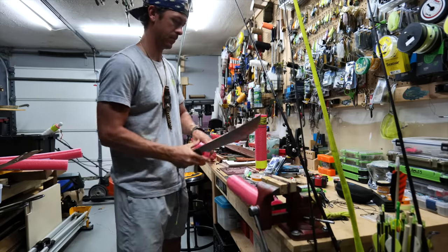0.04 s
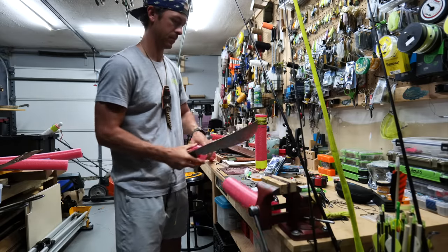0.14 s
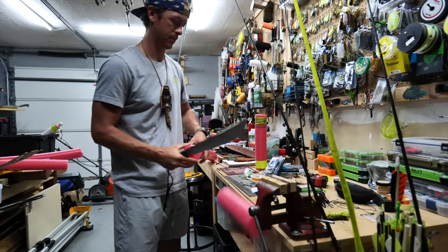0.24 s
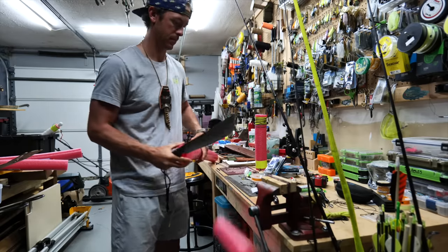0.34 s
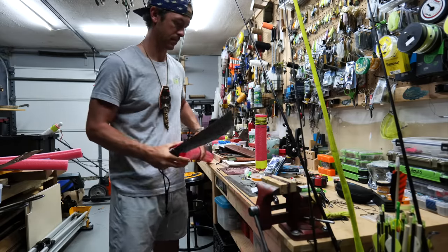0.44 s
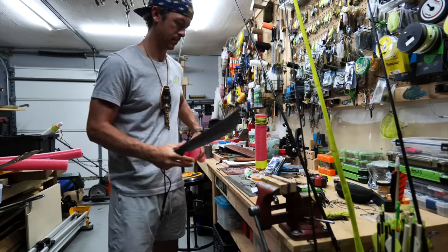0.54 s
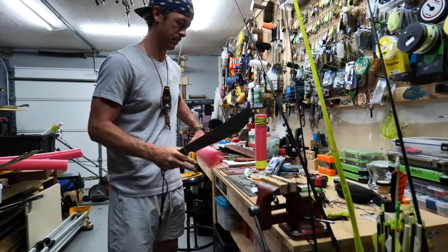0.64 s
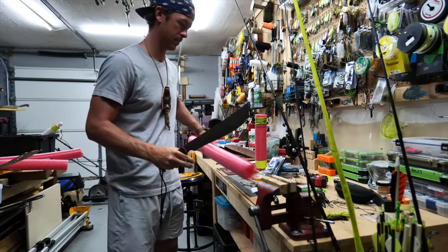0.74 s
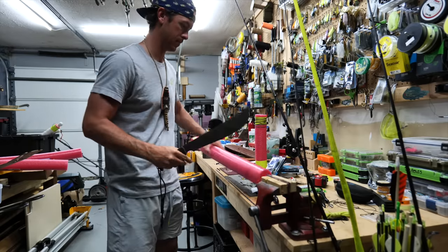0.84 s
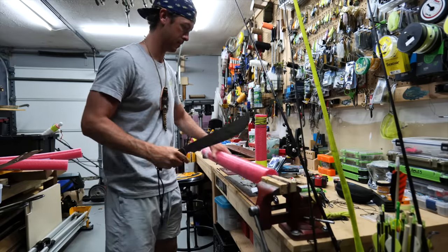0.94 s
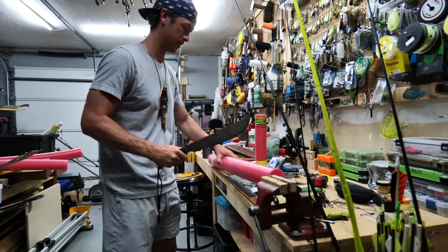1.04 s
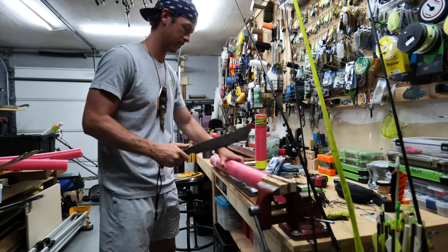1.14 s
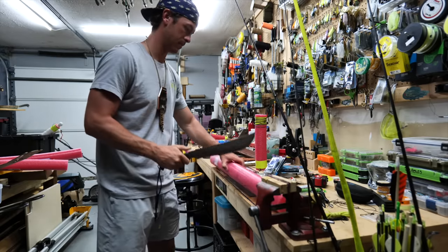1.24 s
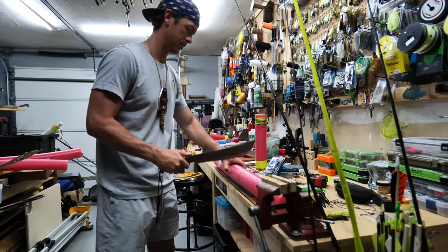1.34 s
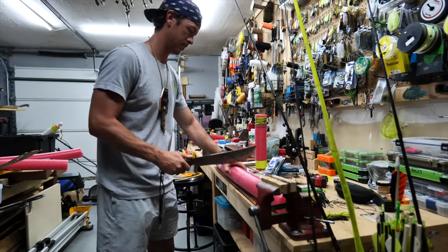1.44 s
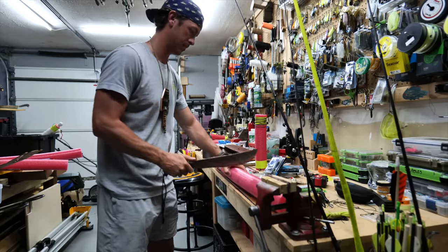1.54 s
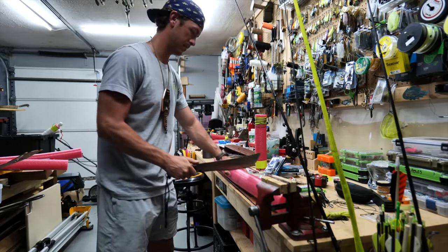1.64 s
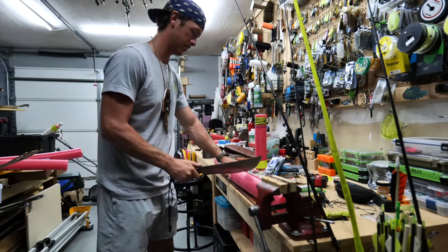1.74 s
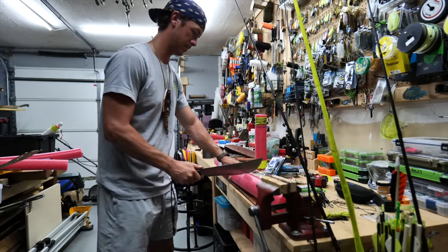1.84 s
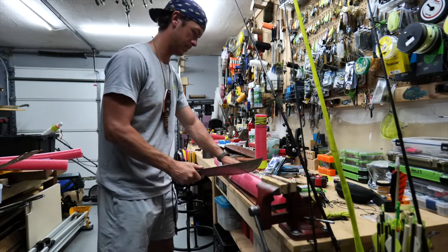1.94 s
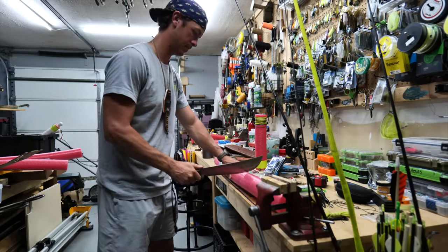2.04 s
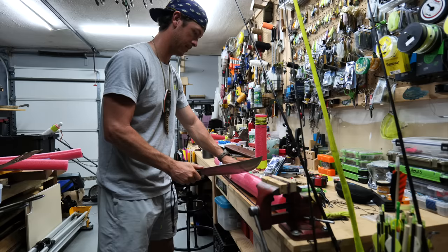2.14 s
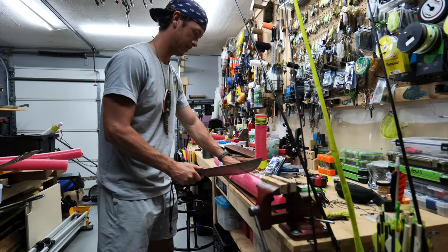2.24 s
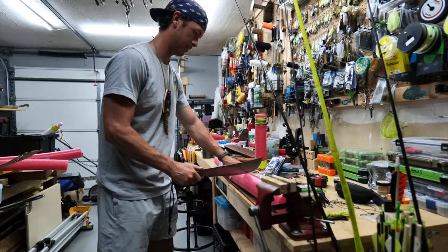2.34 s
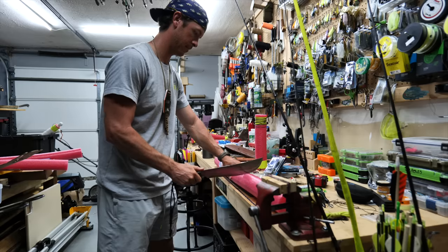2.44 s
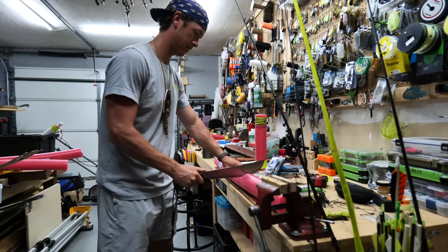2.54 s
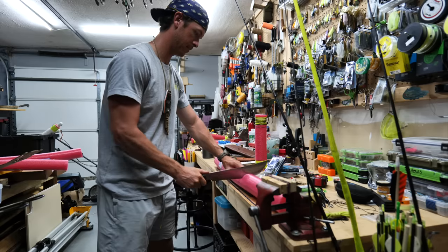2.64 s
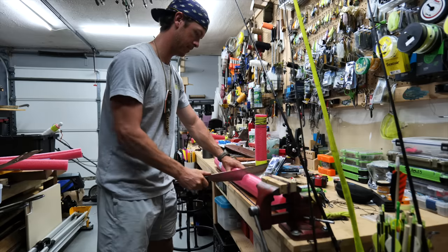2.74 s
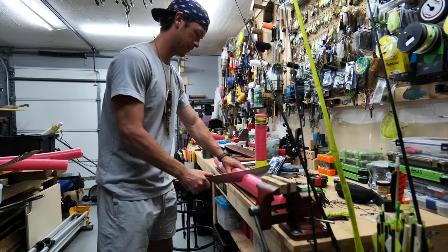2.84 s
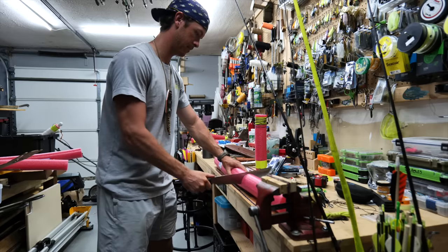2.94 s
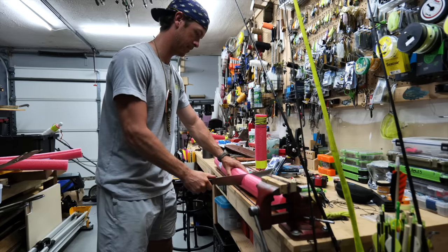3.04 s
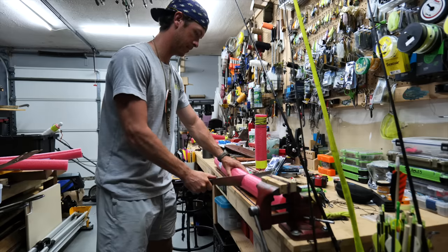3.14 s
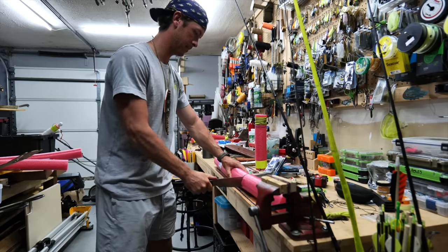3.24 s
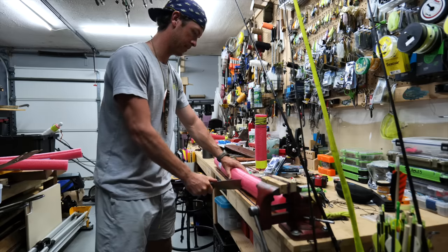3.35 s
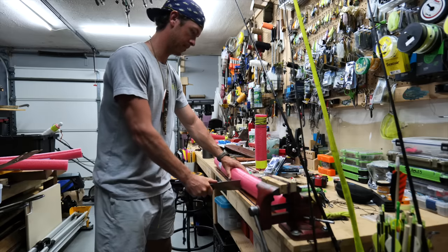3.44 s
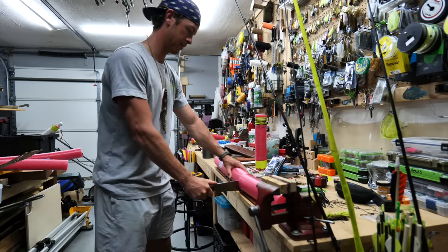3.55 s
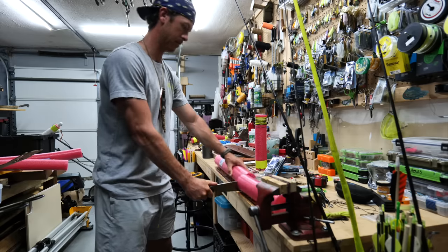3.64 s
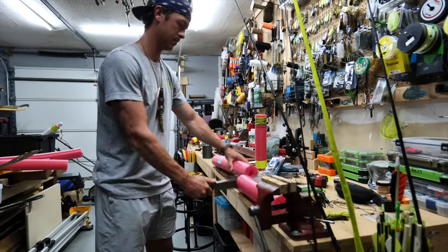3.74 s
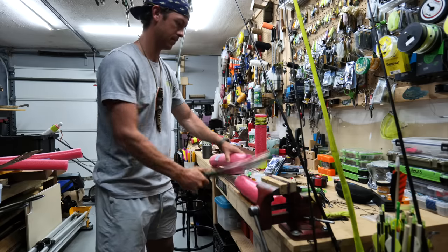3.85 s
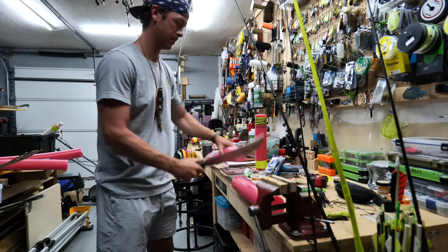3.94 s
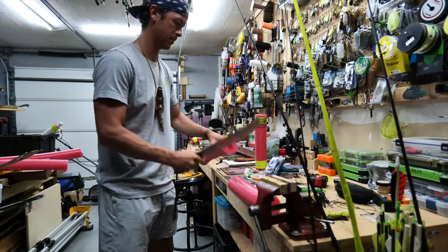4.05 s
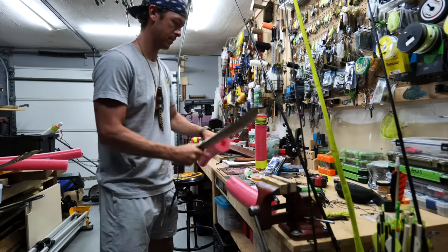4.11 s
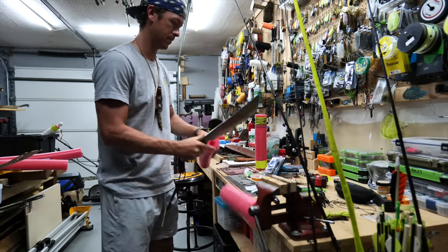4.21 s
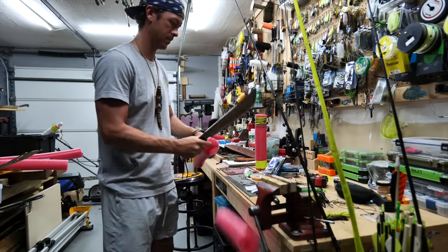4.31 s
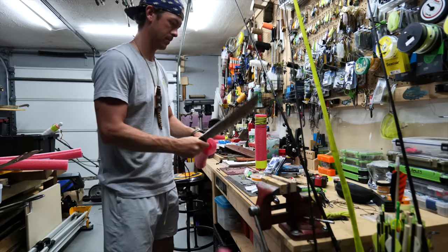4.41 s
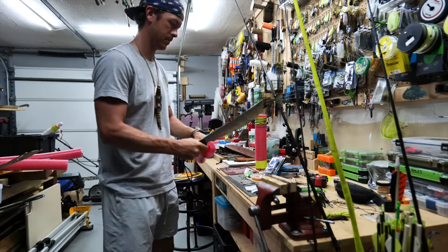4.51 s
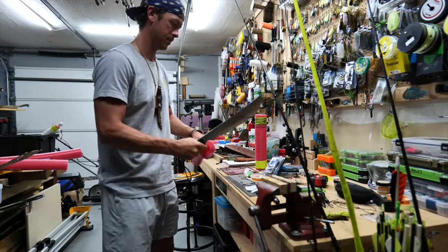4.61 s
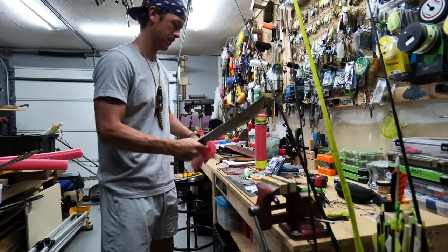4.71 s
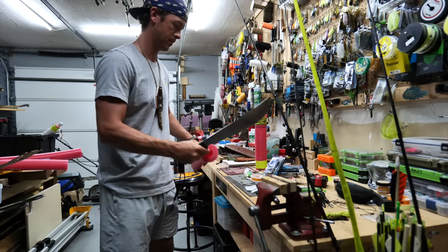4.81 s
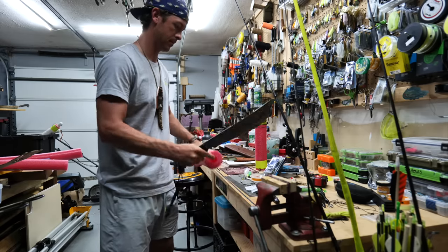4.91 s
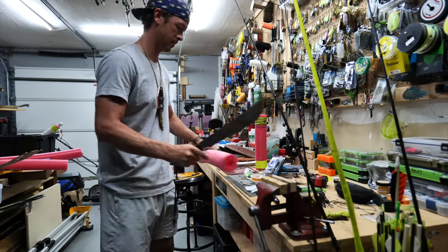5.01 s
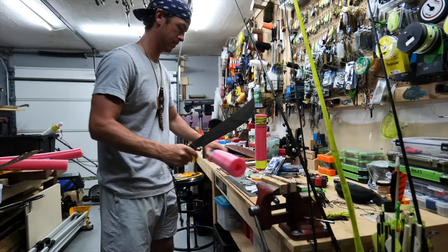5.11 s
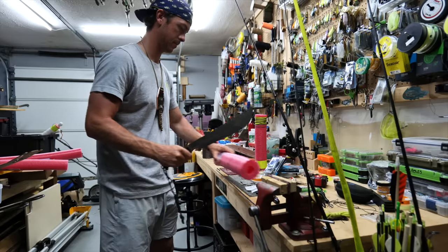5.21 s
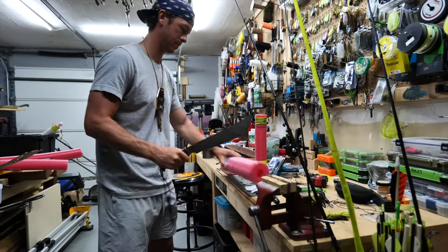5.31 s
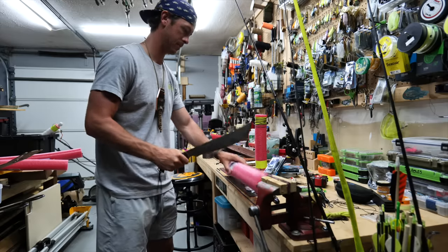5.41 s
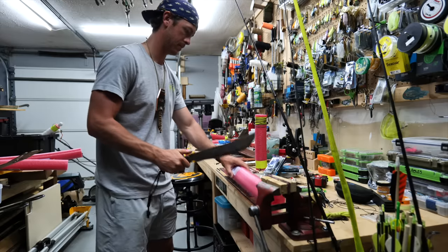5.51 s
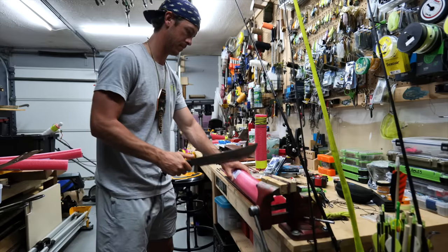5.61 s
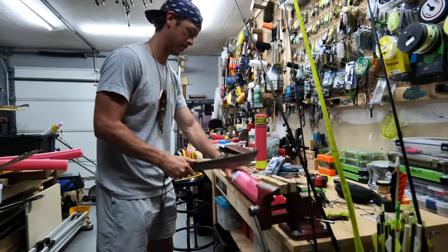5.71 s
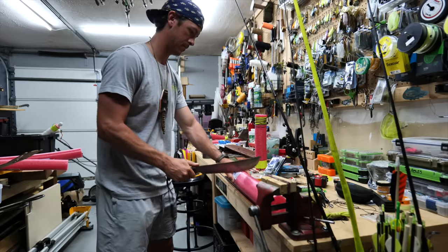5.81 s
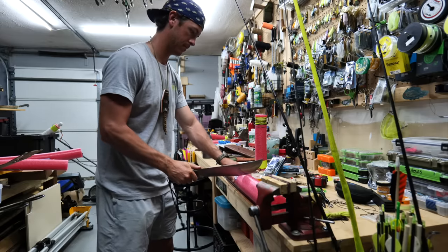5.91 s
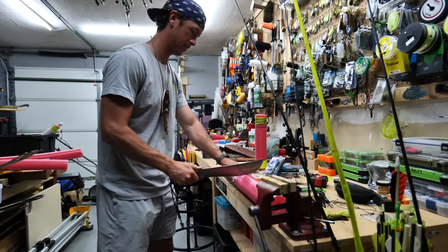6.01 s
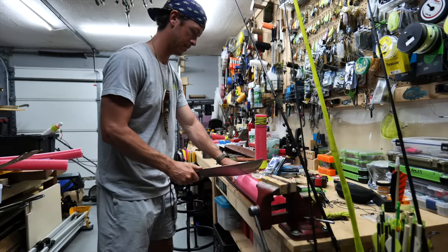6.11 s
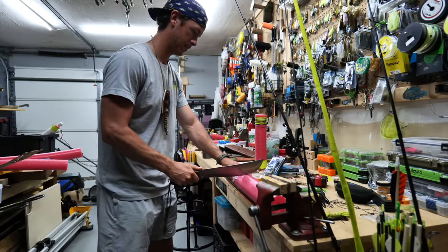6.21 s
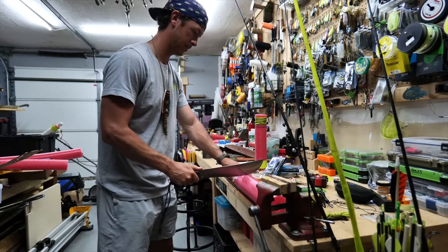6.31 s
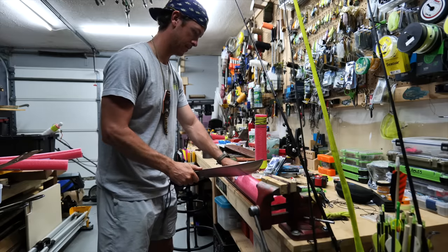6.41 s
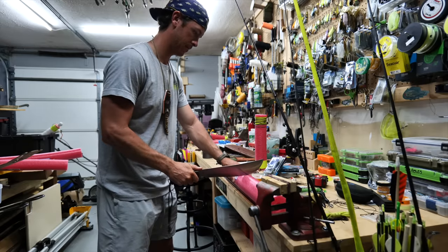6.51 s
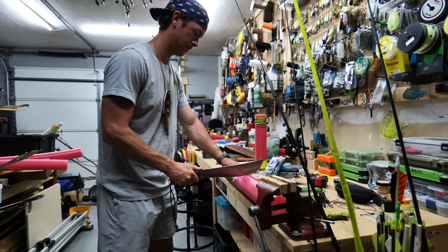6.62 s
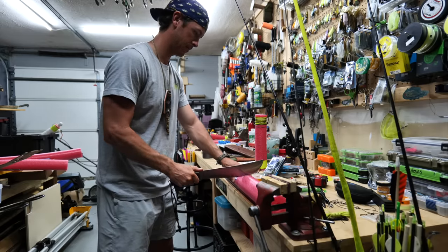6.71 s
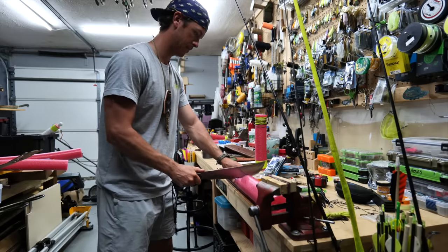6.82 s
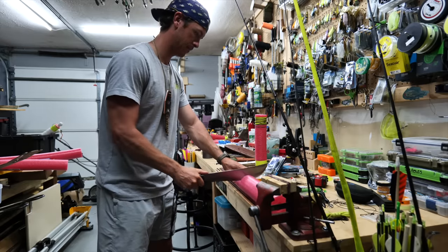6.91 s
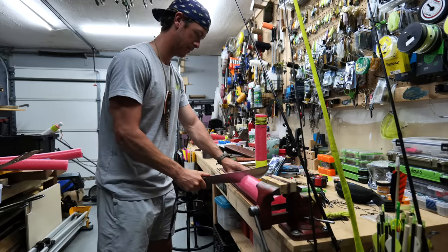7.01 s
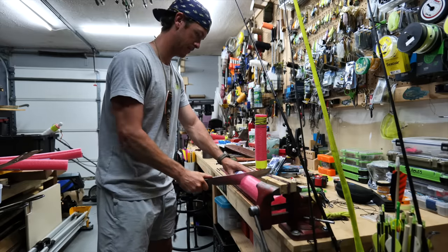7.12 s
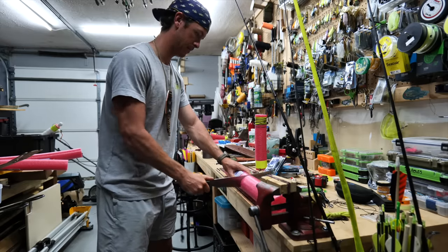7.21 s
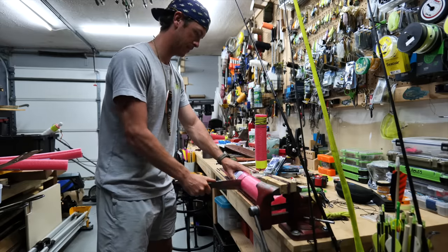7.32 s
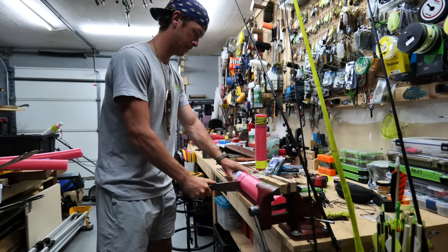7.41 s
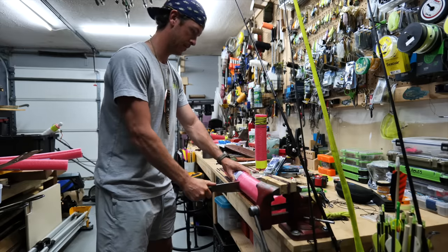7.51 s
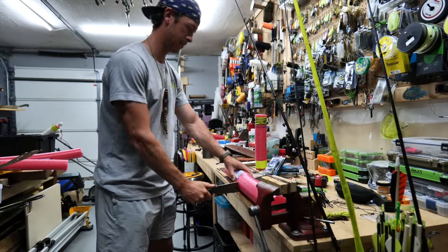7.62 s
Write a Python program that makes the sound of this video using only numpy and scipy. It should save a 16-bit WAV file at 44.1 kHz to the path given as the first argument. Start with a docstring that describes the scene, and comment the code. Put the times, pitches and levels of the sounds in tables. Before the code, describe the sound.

Two crackling, hissing cuts through stiff foam, hollow tube pieces smacking concrete and bouncing, hands scuffing foam, over a low garage drone.

```python
"""A machete slices lengths off a foam pool noodle in a bench vice: its cells burst in a crackling hiss. Patches
of foam snap under the jerking blade, a low pop falls in pitch as the blade breaks through, and blade and noodle
knock. Two cut lengths drop to the concrete floor and bounce; decaying sines ring their bores as open pipes.
Hands slide and scuff the foam as grains and noise bursts, over the steady drone and hiss of the garage. A
nearly mono microphone clips the loudest peaks."""
import sys
import numpy as np
from scipy import signal
from scipy.fft import rfft, irfft
from scipy.io import wavfile

SR = 44100
rng = np.random.default_rng(int(sys.argv[2]) if len(sys.argv) > 2 else 0)


def transcribe(signal):
    """Save signal, clipped to [-1, 1], as a 16-bit WAV file at the path in sys.argv[1]."""
    frames = np.atleast_2d(signal).T
    limited = np.clip(frames, -1, 1)
    pcm = np.round(limited * 32767).astype(np.int16)
    wavfile.write(sys.argv[1], SR, pcm)


N = 337806   # length of the scene [samples]


def from_db(db):
    """Decibels to gain."""
    return 10 ** (np.asarray(db) / 20)


def rms_one(x):
    """Scale to rms 1."""
    return x / np.sqrt(np.mean(x ** 2) + 1e-20)


def at_hz(points, hz):
    """Read a table on a log-frequency axis."""
    known_hz, values = np.transpose(points)
    return np.interp(np.log(hz + 1e-6), np.log(known_hz), values)


def add(track, s, sound):
    """Mix a sound in at a time in seconds."""
    start = round(s * SR)
    track[start:start + len(sound)] += sound[:N - start]


def cut(x, hz, kind, order=2):
    """Butterworth filter."""
    safe_hz = np.clip(hz, 10, .45 * SR)
    sections = signal.butter(order, safe_hz, kind, fs=SR, output="sos")
    return signal.sosfilt(sections, x + 1e-18)


def colour(x, spectrum, size=4096):
    """Causal (minimum-phase) filter with the given spectrum; keeps the power of white noise."""
    gains = from_db(at_hz(spectrum, np.fft.rfftfreq(size, 1 / SR)))
    cepstrum = irfft(np.log(gains))
    # fold the cepstrum onto positive time: minimum phase
    cepstrum[1:size // 2] *= 2
    cepstrum[size // 2 + 1:] = 0
    response = irfft(np.exp(rfft(cepstrum)))
    return signal.fftconvolve(x, response / np.linalg.norm(response))[:len(x)]


def dying(t60):
    """Half a second of exponential decay, down 60 dB after t60 seconds."""
    return np.exp(-np.log(1000) * np.arange(SR // 2) / SR / max(t60, 1e-4))


def burst(t60):
    """Dying white noise."""
    return dying(t60) * rng.standard_normal(SR // 2)


def ring(modes, pitch=1):
    """Struck modes as dying sines."""
    t = np.arange(SR // 2) / SR
    return sum(from_db(db) * dying(t60) * np.sin(2 * np.pi * hz * pitch * t) for hz, db, t60 in modes)


def grains(per_s, spread_db, clump_db, clumps_per_s):
    """Random clicks, sized by spread_db, whose level swells in clumps; rms 1."""
    sizes = from_db(spread_db * np.minimum(rng.exponential(1, N), 4))
    clicks = sizes * rng.choice([-1, 1], N) * (rng.random(N) < per_s / SR)
    clumps = rms_one(cut(rng.standard_normal(N), clumps_per_s, "low"))
    return rms_one(clicks * from_db(clump_db * np.clip(clumps, -2, 2)))


# Strokes through the noodle: (edge bites [s], breaks through [s], crackle at the bite [dB],
# crackle late in the stroke [dB], surge at the break [dB])
STROKES = [(2.482, 3.339, -38.5, -29.5, 12), (6.811, 7.379, -34.5, -31.5, 11)]
# The hand lets up once before the last push: (time [s], half-length [s], level change [dB])
EASE_OFF = (3.18, 0.11, -14)


def blade_effort(bite_s=0.0046, surge_s=0.13, release_db_per_s=348):
    """Each stroke bites, presses slowly harder, surges as the last wall gives and dies away; as gain."""
    t, effort = np.arange(N) / SR, 0
    for start_s, break_s, first_db, late_db, surge_db in STROKES:
        press = np.interp(t, [start_s, break_s], [first_db, late_db])
        surge = surge_db * np.exp(np.minimum(t - break_s, 0) / surge_s)
        release = release_db_per_s * np.maximum(t - break_s, 0)
        bite = np.clip((t - start_s) / bite_s, 0, 1)
        effort = effort + bite * from_db(press + surge - release)
    ease_s, half_s, ease_db = EASE_OFF
    return effort * from_db(ease_db * np.exp(-((t - ease_s) / half_s) ** 2))


# Colour of bursting cells: (frequency [Hz], relative level per Hz [dB])
FOAM_COLOUR = [(65, -54), (110, -16), (201, -4.5), (381, -5), (666, -8), (739, -9), (1010, -4), (1210, -5),
               (1400, 2), (1920, -1), (2040, -0.5), (3210, -3), (4760, -2), (10500, -13.5), (15500, -23.5)]
# Ring of the noodle and blade under the crackle: (frequency [Hz], width [Hz], gain [dB])
FOAM_MODES = [(644, 66, 6), (998, 21, 2.5), (1350, 70, -6), (2750, 41, -2), (3140, 40, -21),
              (5070, 91, -16)]


def foam_body(x):
    """Colour of the foam with its narrow resonances on top."""
    coloured = colour(x, FOAM_COLOUR)
    body = coloured
    for hz, width, db in FOAM_MODES:
        b, a = signal.iirpeak(hz, hz / width, fs=SR)
        body = body + from_db(db) * signal.lfilter(b, a, coloured)
    return body


def slicing(low_db=-8, mid_db=-1.5, treble_db=-7, rip_db=0.0, grit_db=-4, low_growth=0.71):
    """Thousands of closed cells a second burst at the edge; the lows follow the effort less than the hiss."""
    fine = grains(per_s=8400, spread_db=0.0, clump_db=3.0, clumps_per_s=230)
    grit = grains(per_s=100, spread_db=2.0, clump_db=0.5, clumps_per_s=28)
    cells = foam_body(fine + from_db(grit_db) * grit)
    effort = blade_effort()
    push = effort / effort.max()
    # lows grow 0.71 dB per dB of crackle, so harder pushes sound thinner
    low_effort = effort.max() * push ** low_growth
    low = from_db(low_db) * low_effort * rms_one(cut(cells, 1300, "low", order=4))
    mid = from_db(mid_db) * rms_one(cut(cells, [950, 7000], "band", order=4))
    treble = from_db(treble_db) * rms_one(cut(cells, 8100, "high", order=4))
    # under the hardest push the last wall rips, coarser and brighter
    tears = grains(per_s=2600, spread_db=4.5, clump_db=3, clumps_per_s=83)
    rip = from_db(rip_db) * push * rms_one(cut(tears, [3000, 5800], "band"))
    return low + effort * (mid + treble + rip)


# Jerks of the blade that snap a patch of foam:
# (time [s], relative level [dB], relative treble lift [dB], crumble t60 [s])
SNAPS = [(2.488, -23, 11.5, 0.029), (2.538, -20, 1, 0.048), (2.806, -11, -5, .02), (2.855, -18, 3, 0.017),
         (2.906, -11, -15, 0.017), (3.11, -8, -8, 0.077), (3.269, -4, -19, 0.066),
         (3.309, -22.5, 19, 0.013), (3.334, -7.5, -1.5, .045), (3.354, -9, -10, .015),
         (3.452, -12.5, 1, 0.038), (3.489, -8.5, -7, 0.034), (6.786, -22.5, 2, 0.031),
         (6.817, -9, 5.5, 0.052), (6.832, -15, 2, .015), (6.852, -9.5, -13, 0.028), (6.871, -7.5, -2, .02),
         (6.877, -11, 4, 0.023), (6.911, -9, 8, 0.0098), (7.166, -8.5, -7, 0.07), (7.338, -13.5, 9.5, 0.02),
         (7.36, -9, 8, 0.02), (7.394, 5, -2, 0.011)]


def snapping(crack_db=3, crumble_db=-12, thin_hz=700, treble_db=6):
    """A whole patch of cell walls gives way at once: one sharp crack, then a brief crumble."""
    out = np.zeros(N)
    for s, db, bright_db, crumble_t60 in SNAPS:
        crack = from_db(crumble_db) * burst(crumble_t60)
        crack[0] += from_db(crack_db)
        dull = cut(crack, 7500, "low", order=1)
        bright = from_db(bright_db + treble_db) * (crack - dull)
        add(out, s, from_db(db) * (dull + bright))
    return cut(foam_body(out), thin_hz, "high", order=1)


# A low pop sounds as the blade breaks through and the bore opens: # (time [s], level [dB], starting frequency
# [Hz])
THUMPS = [(3.333, -31, 197), (7.389, -13, 226), (7.411, -14, 204), (7.424, -19, 132)]


def pops(rise_s=0.003, sag_per_s=2.2):
    """Soft, low pops: they swell, and sag in pitch."""
    out, t = np.zeros(N), np.arange(SR // 2) / SR
    swell = t / rise_s * np.exp(1 - t / rise_s)
    for s, db, hz in THUMPS:
        phase = 2 * np.pi * np.cumsum(hz * np.exp(-sag_per_s * t)) / SR
        add(out, s, from_db(db) * swell * np.sin(phase))
    return out


# Blade and noodle knock against the vice and bench: (time [s], level [dB], centre frequency [Hz])
BLADE_KNOCKS = [(0.969, -29.5, 1720), (1.689, -36, 1550), (3.115, -31, 1520), (3.489, -18.5, 1250),
                (4.337, -43, 1350), (6.814, -13.5, 716)]


def blade_knocks(knock_t60=.028):
    """Short hollow knocks, damped by the foam: dying narrow bands of noise."""
    out = np.zeros(N)
    for s, db, hz in BLADE_KNOCKS:
        band = rms_one(cut(rng.standard_normal(SR), [0.82 * hz, 1.16 * hz], "band"))
        hollow = band[-(SR // 2):]   # the filter has settled by then
        add(out, s, from_db(db) * dying(knock_t60) * hollow)
    return out


# Landings of each cut length on the floor:
# (time [s], strength [dB], contact cut-off [Hz], relative thud level [dB])
LANDINGS = [
    [(.682, -20, 2520, 7), (.6945, 4, 6450, -8.5), (.7016, -19.5, 6000, -23), (.994, -38, 900, -8),
     (1.072, -4, 6500, -11), (1.232, -32, 2000, -3), (1.240, -20, 1910, -3), (1.396, -29, 1400, -8),
     (1.829, -43.5, 800, -20), (1.998, -39, 1920, -13)],
    [(4.687, -15.5, 3000, -9), (4.691, 5, 7060, -8.5), (4.6985, -12, 3000, -9), (5.0895, -1, 3430, -18.5),
     (5.289, -26, 1700, 3), (5.402, -27.5, 1600, -16), (5.536, -33, 1930, -9), (5.600, -73, 1900, -14)],
]
# Air column of the first and the second cut length: (fundamental [Hz])
PIPE_HZ = [342.6, 407]
# Overtones of the air column: (multiple of the pipe pitch [ratio], relative level [dB])
PIPE_OVERTONES = [(2.001, -2), (2.9, -10), (3.7, -16), (4.7, -23)]
# Slap of the foam wall on concrete: (frequency [Hz], relative level per Hz [dB])
SLAP_COLOUR = [(100, -49.5), (290, -10.5), (400, -0.5), (520, 0), (900, 4), (1150, -1), (1450, 4),
               (1750, -0.5), (2100, -8), (2850, -5.5), (3500, -15.5), (5500, -16), (9000, -21.5),
               (15000, -33)]


def falling_lengths(slap_db=-2, slap_t60=0.046, strike_db=14, hum_db=-14.0, hum_t60=0.13,
                    overtone_db=4.0, overtone_t60=.045, thud_db=-11):
    """Each landing slaps the wall, thuds and rings the bore; softer ones hum more. Gives (slaps, pipes)."""
    hum_growth, overtone_growth = 0.47, 1.3   # dB per dB of landing strength
    slaps, pipes = np.zeros((2, N))
    overtones = [(multiple, db, overtone_t60) for multiple, db in PIPE_OVERTONES]
    thud = cut(ring([(142, 0.0082, 0.079)]), 110, "high", order=4)
    for pitch_hz, landings in zip(PIPE_HZ, LANDINGS):
        for s, db, contact_hz, low_db in landings:
            contact = burst(slap_t60)
            contact[0] += from_db(strike_db)   # one clean strike, then the wall crumples
            slap = from_db(slap_db) * cut(colour(contact, SLAP_COLOUR), contact_hz, "low")
            add(slaps, s, from_db(db) * (slap + from_db(thud_db + low_db) * thud))
            hum = ring([(pitch_hz, hum_db + hum_growth * db, hum_t60)])
            upper = from_db(overtone_db + overtone_growth * db) * ring(overtones, pitch_hz)
            # the open ends radiate little below the fundamental
            pipe = cut(hum + upper, .8 * pitch_hz, "high")
            add(pipes, s, cut(pipe, contact_hz, "low"))
    return slaps, pipes


# A hand slides along the foam: (time [s], length [s], relative level [dB])
SLIDES = [(0, 0.013, -35.5), (0.087, .2, -48), (.29, .28, -38), (3.634, 0.23, -50.5), (4.545, 0.21, -40.5)]
# Colour of skin on foam, for slides and scuffs: (frequency [Hz], relative level per Hz [dB])
RUB_COLOUR = [(180, -28.5), (300, -5.5), (637, -5), (975, -7), (1400, -1), (2000, -6.5), (5350, -7),
              (15000, -20.5)]


def handling(rub_db=-2, attack_s=.025, release_s=0.041):
    """Skin drags over the rough foam in fine grains; each slide swells, holds and fades."""
    t, pressure = np.arange(N) / SR, 0
    for s, length, db in SLIDES:
        swell = np.clip((t - s) / attack_s, 0, 1)
        fade = np.exp(-np.maximum(t - s - length, 0) / release_s)
        pressure = pressure + from_db(db) * swell * fade
    skin = grains(per_s=9800, spread_db=1.5, clump_db=1.0, clumps_per_s=78)
    return from_db(rub_db) * pressure * colour(skin, RUB_COLOUR)


# Fingers scuff the foam as they change grip: (time [s], level [dB], treble lift [dB])
SCUFFS = [(.158, -37.5, -3), (0.94, -37.5, 11.5), (0.97, -37, 6.5), (.989, -42.5, 14.5), (1.691, -40, -0.5),
          (3.747, -36, -18), (3.984, -38.5, -2.5), (4.166, -47, 1), (4.333, -49, 9.5), (4.565, -31.5, -1.5),
          (4.9, -29, -17)]


def scuffs(scuff_t60=0.083, rise_s=0.00099):
    """Short soft rasps of skin on foam: noise bursts with a rounded onset."""
    out = np.zeros(N)
    onset = 1 - np.exp(-np.arange(SR // 2) / SR / rise_s)
    for s, db, lift_db in SCUFFS:
        rasp = onset * burst(scuff_t60)
        dull = cut(rasp, 6000, "low", order=1)
        add(out, s, from_db(db) * (dull + from_db(lift_db) * (rasp - dull)))
    return colour(out, RUB_COLOUR)


# Decay of the cluttered garage: (frequency [Hz], t60 [s])
GARAGE_T60 = [(100, 0.18), (400, 0.4), (1000, 0.23), (3000, 0.33), (7000, 0.41), (15000, 0.29)]


def garage_tail():
    """Dense noise tail off the clutter, built from bands that each die at their own rate."""
    edges = np.geomspace(60, 17000, 11)
    tail = 0
    for low, high in zip(edges, edges[1:]):
        t60 = at_hz(GARAGE_T60, np.sqrt(low * high))
        tail = tail + cut(burst(t60), [low, high], "band")
    return tail / np.linalg.norm(tail)


def garage(x, wet_db, delay_s=.004, width_db=-22):
    """Direct sound plus a delayed dense tail; the two channels hear it almost alike."""
    delay = round(abs(delay_s) * SR)
    mid, side = [signal.fftconvolve(x, np.pad(garage_tail(), (delay, 0)))[:N] for _ in range(2)]
    return x + from_db(wet_db) * (mid + from_db(width_db) * side * np.array([[1], [-1]]))


# Drone and hiss of the garage: (frequency [Hz], relative level per Hz [dB])
BACKGROUND_COLOUR = [(25, -7.5), (55, -7), (80, -5.5), (120, -2), (240, 1), (310, -7.5), (900, -16.5),
                     (1400, -22.5), (2000, -21), (2600, -15.5), (3700, -15.5), (7900, -16.5), (9300, -26),
                     (15500, -36.5)]


def background(level_db=-47, side_db=-17):
    """Steady low drone and hiss as coloured noise, differing only a little between the channels."""
    mid, side = [from_db(level_db) * colour(rng.standard_normal(N), BACKGROUND_COLOUR) for _ in range(2)]
    return mid + from_db(side_db) * side * np.array([[1], [-1]])


def scene():
    """The work at the bench and the lengths on the floor in the garage, over its background."""
    at_work = slicing() + snapping() + cut(pops(), 78, "high") + blade_knocks() + handling() + scuffs()
    on_bench = garage(at_work, wet_db=-9, width_db=-48)
    slaps, pipes = falling_lengths()
    # the slap spreads all round the room; the bore is heard more directly from its open end
    on_floor = garage(slaps, wet_db=-6.5, delay_s=.008, width_db=-41.0)
    on_floor = on_floor + garage(pipes, wet_db=-10.5, delay_s=0.0081, width_db=-34.5)
    return on_bench + on_floor + background()


def record(dry):
    """The microphone input clips just below full scale, then a steep low-pass cuts the top."""
    clipped = np.clip(dry, -.97, .97)
    # 60 dB down from 16700 Hz upwards
    top_cut = signal.cheby2(16, 60, 16700, fs=SR, output="sos")
    return signal.sosfilt(top_cut, clipped)


dry = scene()
out = record(dry)
transcribe(out)
```